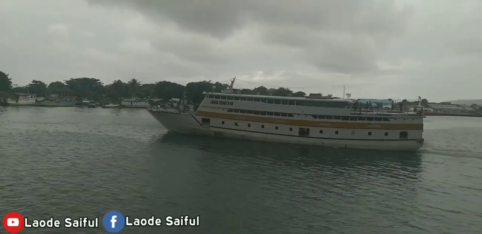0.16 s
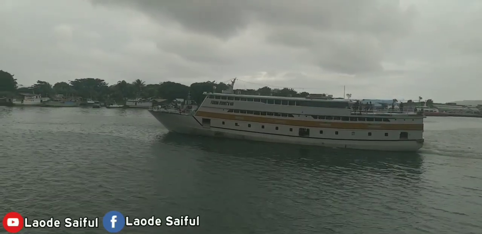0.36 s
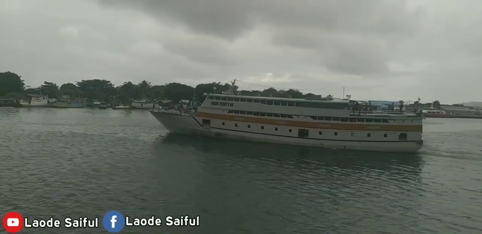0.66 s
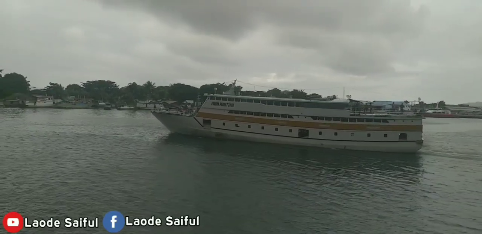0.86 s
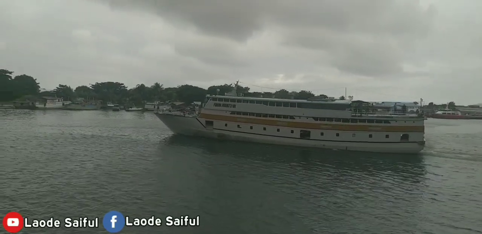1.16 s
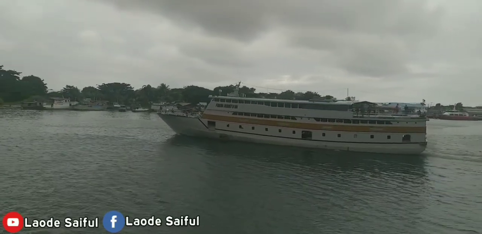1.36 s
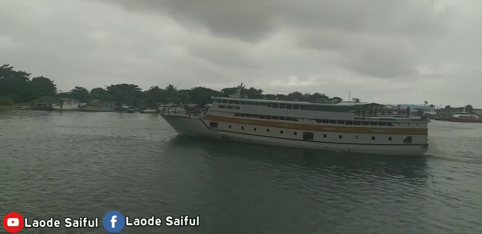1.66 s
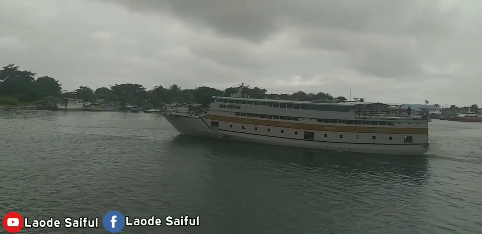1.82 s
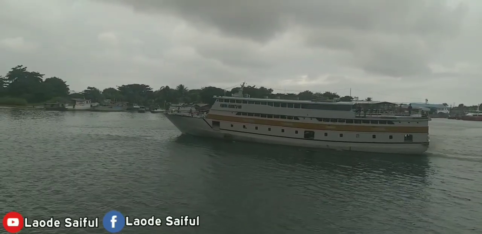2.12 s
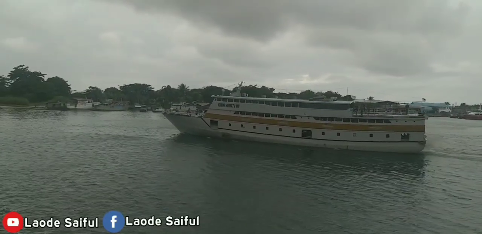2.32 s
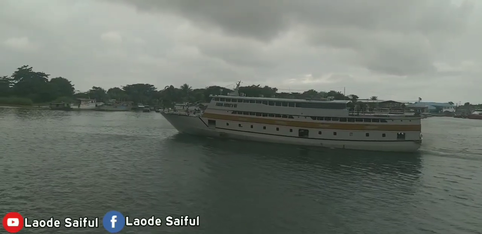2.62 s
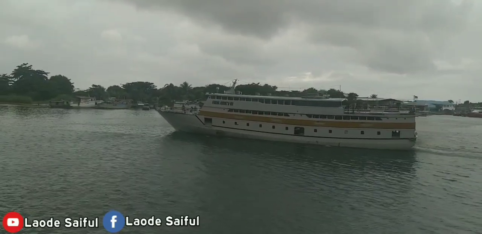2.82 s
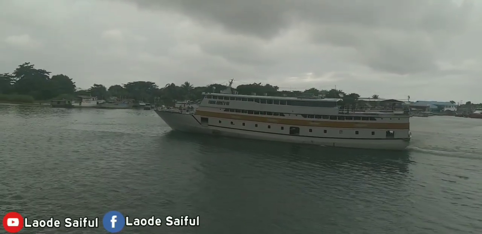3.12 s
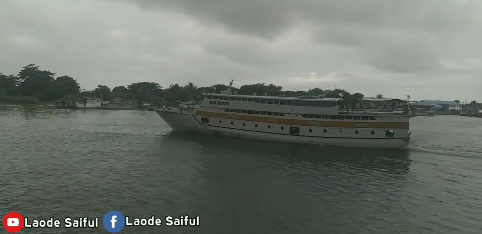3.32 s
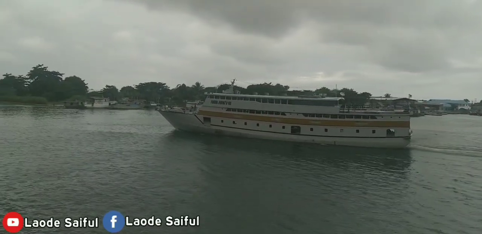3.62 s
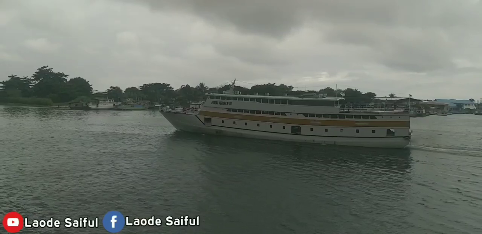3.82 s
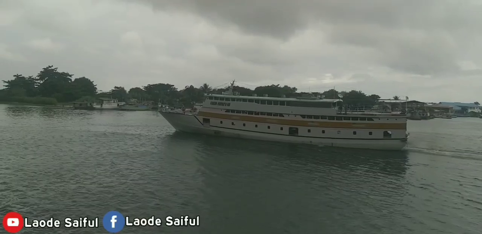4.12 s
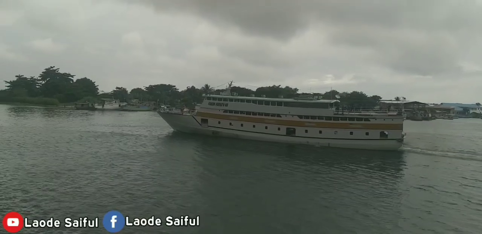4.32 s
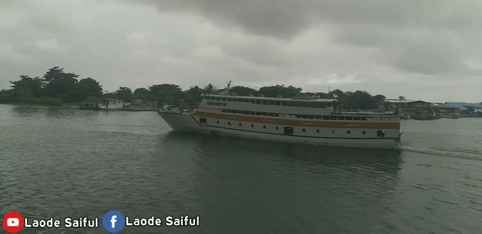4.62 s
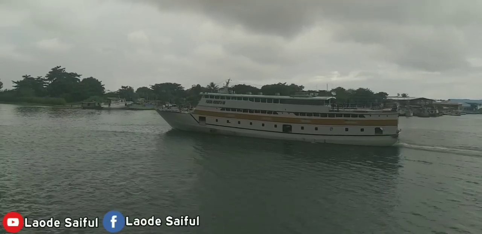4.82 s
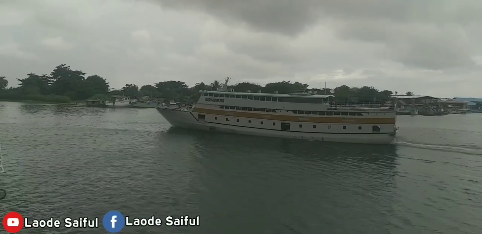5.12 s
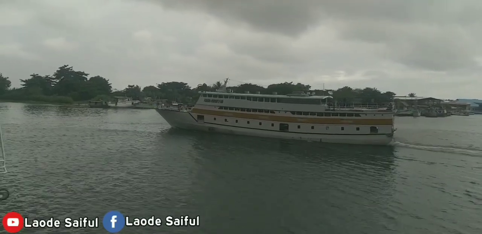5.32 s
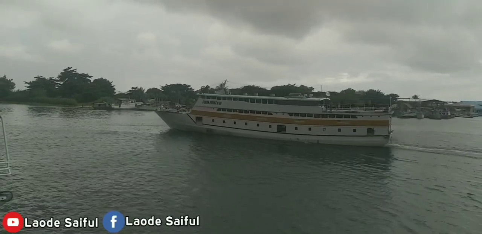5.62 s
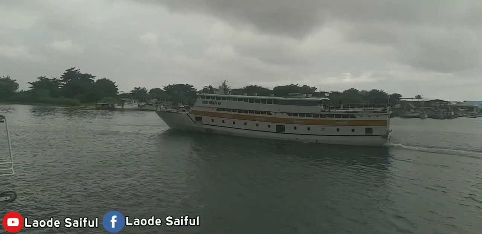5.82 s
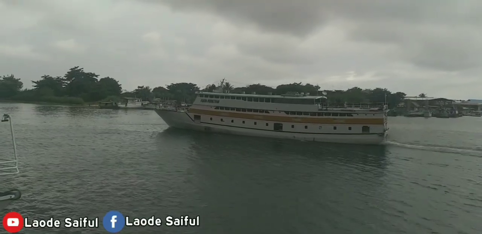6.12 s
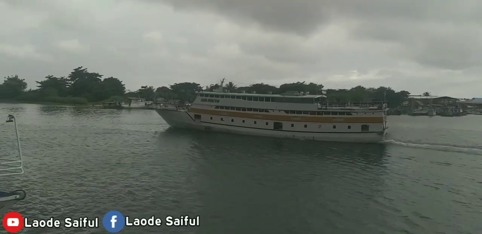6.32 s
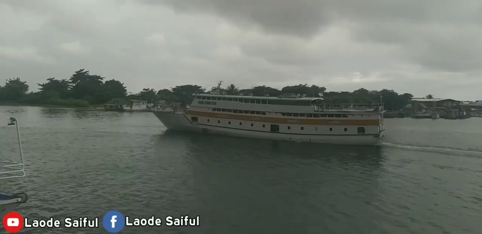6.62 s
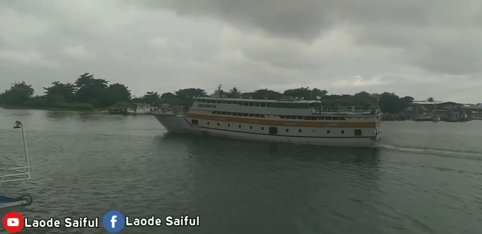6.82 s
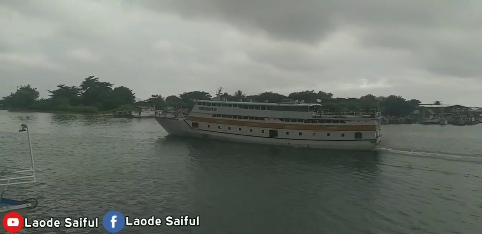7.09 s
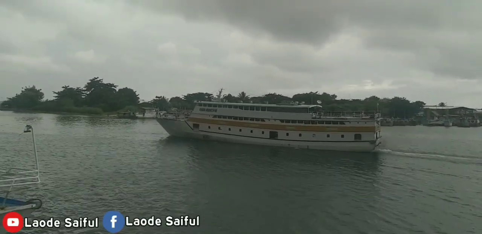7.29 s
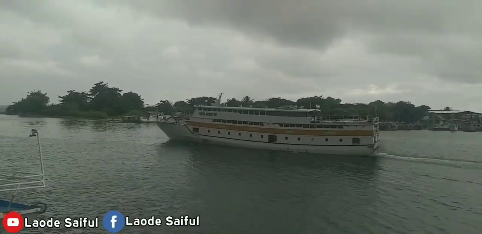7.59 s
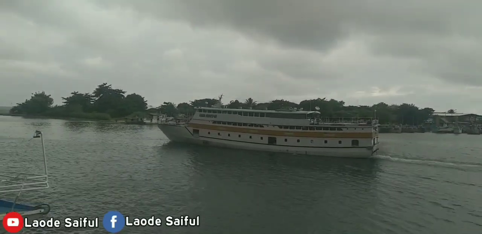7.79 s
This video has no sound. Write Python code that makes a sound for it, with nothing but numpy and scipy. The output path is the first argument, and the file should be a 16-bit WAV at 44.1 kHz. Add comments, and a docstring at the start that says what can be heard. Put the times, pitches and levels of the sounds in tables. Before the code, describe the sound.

A slow single-cylinder boat engine knocks and ticks in a fast even rattle over open water while gusts of wind buffet the microphone.

```python
"""Slow boat engine across open water

A single-cylinder engine knocks eleven times a second, each knock followed by a brighter tick: short pulses
ring through resonances, with a bounce off the water and tails of noise.
Gusts buffet the phone's microphone as uneven low noise, and single slaps of air sound as dying low cycles.
Under it all, shaped noise makes the far hiss of the wash, with splashes on the hull and finer spray."""
import sys
import numpy as np
from scipy import signal
from scipy.fft import rfft, irfft, next_fast_len
from scipy.io import wavfile
from scipy.ndimage import uniform_filter1d

SR = 44100
rng = np.random.default_rng(int(sys.argv[2]) if len(sys.argv) > 2 else 0)


def pcm_store(signal):
    """Save signal as 16-bit PCM."""
    levels = np.round(np.clip(np.atleast_2d(signal), -1, 1) * 32767)
    wavfile.write(sys.argv[1], SR, levels.astype(np.int16).T)


N = 350595  # length in samples


def undb(db):
    """Amplitude ratio of a level in dB."""
    return 10 ** (np.asarray(db) / 20)


def unit(x):
    """Scale to an RMS of 1."""
    return x / np.sqrt(np.mean(x ** 2))


def curves(table, s):
    """Columns of a table, joined by straight lines and read at the times s."""
    t, *columns = np.transpose(table)
    return [np.interp(s, t, column) for column in columns]


def noise():
    """White noise over the whole scene."""
    return rng.standard_normal(N)


def walk(rate):
    """Random levels held 1 / rate seconds and smoothed twice into slopes; RMS 1."""
    hold = int(SR / rate)
    steps = np.repeat(rng.standard_normal(N // hold + 1), hold)
    return unit(uniform_filter1d(uniform_filter1d(steps, hold), hold)[:N])


def colour(x, points):
    """Filter by the gains of (f/Hz, level/dB) points on a log-frequency axis."""
    hz, db = np.transpose(points)
    size = next_fast_len(N)
    f = np.maximum(np.arange(size // 2 + 1) * SR / size, 1)
    gain = undb(np.interp(np.log(f), np.log(hz), db))
    return irfft(rfft(x, size) * gain, size)[:N]


def band(x, hz, width_hz):
    """One resonance, gain 1 at the centre."""
    return signal.lfilter(*signal.iirpeak(hz, hz / width_hz, SR), x)


def steep(x, hz, width_hz):
    """A resonance applied twice, for steeper sides."""
    return band(band(x, hz, width_hz), hz, width_hz)


def below(x, hz):
    """Steep low-pass."""
    return signal.sosfilt(signal.butter(4, hz, fs=SR, output="sos"), x)


def fade(x, t60):
    """Every pulse leaves an exponential tail that drops 60 dB in t60 seconds."""
    return signal.lfilter([1], [1, -np.exp(-np.log(1000) / (t60 * SR))], x)


def even_out(x, share, seconds):
    """Take part of the chance swell out of narrow noise."""
    swell = np.sqrt(uniform_filter1d(x ** 2, int(seconds * SR)) + 1e-12)
    return unit(x / swell ** share)


def train(s, size):
    """Pulses of the given sizes at the times s."""
    out = np.zeros(N + SR)
    np.add.at(out, (s * SR).astype(int), size)
    return out[:N]


def swells(s, hold, db, rise_db_s, fall_db_s):
    """Summed power of events that rise, hold and fall, each slope straight in dB."""
    t = np.arange(0, N / SR + .002, .002)
    s, hold, db = (np.reshape(column, (-1, 1)) for column in (s, hold, db))
    before_db = np.maximum(rise_db_s * (s - t), 0)
    after_db = np.maximum(fall_db_s * (t - s - hold), 0)
    power = np.sum(undb(db - before_db - after_db) ** 2, axis=0)
    return np.interp(np.arange(N) / SR, t, power)


# waves breaking on the hull: at full strength t/s, hold t/s, splash level/dB, fine spray level/dB
HULL_WAVES = [(.0, .03, -42, -49), (.16, .04, -49, -56), (0.658, .05, -43, -42.5), (.9, .03, -46, -50),
              (1.3, .08, -44, -46), (1.78, 0.15, -41.5, -43), (2.076, 0.065, -44, -43), (2.7, .1, -51, -55),
              (4.26, 0.027, -45, -50), (4.437, 0.026, -40, -44), (4.7, 0.14, -43.5, -43),
              (5.26, .1, -44, -40), (5.43, 0.1, -39, -37.5), (5.6, 0.14, -44, -45),
              (6.0, 0.13, -41.5, -39.5), (6.22, .1, -52, -45), (6.85, .1, -58, -48), (7.105, .06, -44, -42),
              (7.6, .03, -44, -48), (7.83, .12, -44, -47)]
WAVE_RISE_DB_S, WAVE_FALL_DB_S = 112, 80
LAPPING_DB, MIST_DB = -49, -50.5  # splash and spray between waves


def waves():
    """Levels of splash and spray in dB: each wave's power adds to a steady floor."""
    s, hold, splash_db, spray_db = np.transpose(HULL_WAVES)
    levels = []
    for db, rest_db in ((splash_db, LAPPING_DB), (spray_db, MIST_DB)):
        power = undb(rest_db) ** 2 + swells(s, hold, db, WAVE_RISE_DB_S, WAVE_FALL_DB_S)
        levels.append(10 * np.log10(power))
    return levels


# spectrum of the far wash, relative: f/Hz, level/dB
WASH_SPECTRUM = [(240, -5.5), (400, 3.5), (519, -16), (834, -2), (1050, -8), (1560, -9), (1760, -7.5),
                 (2150, -12), (4160, -13), (7670, -23.5), (10400, -21), (14100, -36.5), (15500, -50)]


def water():
    """A steady far hiss, waves splashing on the hull, and the finer spray that they throw."""
    splash_db, spray_db = waves()
    hiss = unit(below(colour(noise(), WASH_SPECTRUM), 9600)) * undb(-37.5 + 0.75 * walk(24.91))
    splash = unit(steep(noise(), 4000, 4000)) * undb(splash_db + 1.2 * walk(30))
    fine = signal.sosfilt(signal.butter(6, 11300, "high", fs=SR, output="sos"), noise())
    fine = fine + undb(-1) * band(fine, 14600, 2500)
    spray = unit(fine) * undb(spray_db + 2.0 * walk(25))
    return hiss + splash + spray


# the wind between gusts, relative: t/s, level/dB, edge above the rumble level/dB
BREEZE_LEVELS = [(0, -24, -10), (.5, -26, -10.5), (1, -25.5, -12), (1.6, -33, -11), (2.1, -13.5, -11),
                 (2.5, -26.5, -3), (3, -23.5, -2), (3.5, -24.5, -7), (4, -23, -6), (4.5, -27.5, -4.5),
                 (5, -25, -5), (5.5, -28, -1), (6.4, -28.5, -5), (6.9, -22.5, -7), (7.3, -31, -12),
                 (7.7, -17.5, -0.5), (7.95, -17.5, -5)]
# gusts, relative: at full strength t/s, hold t/s, level/dB, edge above the rumble level/dB
GUST_EVENTS = [(0.037, .05, -19, -14), (0.215, 0.0041, -16, -7.5), (0.595, 0.053, -19.5, -16),
               (.81, 0.012, -16.5, -27), (.92, 0.017, -10.5, -16), (1.124, .06, -18, -26),
               (1.287, 0.19, -21, -8.5), (1.659, 0.018, -19.5, -15), (1.88, 0.19, -13, -14.5),
               (2.15, 0.085, -12.5, -15), (2.276, .03, -8, -5), (2.597, 0.017, -11.5, -24),
               (2.894, 0.067, -17.5, -16), (3.094, 0.02, -29, -18), (3.2, 0.09, -17.5, -18),
               (3.535, 0.045, -16, -20), (3.637, 0.052, -19, -3), (3.774, 0.0086, -14.5, -9),
               (3.853, 0.019, -8, -10.5), (4.065, 0.019, -13.5, -5), (4.116, 0.027, -16.5, -8),
               (4.219, 0.012, -19, -20), (4.372, 0.013, -13.5, -10), (4.435, 0.07, -18.5, -7),
               (4.7, .03, -26, -12), (5.125, .005, -24, -18), (5.215, .015, -29, -18),
               (5.283, .01, -23, -5), (5.573, 0.016, -20, -5), (6.558, 0.075, -18, -17),
               (6.773, .025, -15.5, -17), (6.924, 0.026, -11, -12), (7.02, 0.026, -16, -9),
               (7.173, 0.014, -15, -20), (7.28, .01, -19, -25), (7.39, 0.024, -8, -15),
               (7.48, .045, -17.5, -19), (7.608, 0.067, -9.5, -5.5), (7.723, .015, -13, -12),
               (7.804, 0.012, -13.5, -2), (7.935, .03, -12, -4)]
GUST_RISE_DB_S, GUST_FALL_DB_S = 360, 213


def gusts():
    """Level of the wind, and of its upper edge above the rumble, both in dB, from summed powers."""
    breeze_db, breeze_edge_db = curves(BREEZE_LEVELS, np.arange(N) / SR)
    s, hold, db, edge_db = np.transpose(GUST_EVENTS)
    power = undb(breeze_db) ** 2 + swells(s, hold, db, GUST_RISE_DB_S, GUST_FALL_DB_S)
    edge = undb(breeze_db + breeze_edge_db) ** 2
    edge = edge + swells(s, hold, db + edge_db, GUST_RISE_DB_S, GUST_FALL_DB_S)
    return 10 * np.log10(power), 10 * np.log10(edge / power)


# spectrum of the wind rumble at the microphone, relative: f/Hz, level/dB
RUMBLE_SPECTRUM = [(15, -70), (25, -40), (59, -19), (123, 1), (172, -3.5), (210, 0), (233, -6), (260, -5.5),
                   (600, -31.5), (780, -69), (1320, -120)]


def wind():
    """Eddies on the microphone: a lumpy rumble that climbs in pitch as the gust grows, with a ragged upper edge."""
    gust_db, edge_db = gusts()
    strong = np.clip((gust_db + 28.0) / 14, 0, 1)  # 0 in a breeze, 1 in a full gust
    eddies = undb((2.32 + 2.2 * strong) * walk(60))
    rumble = even_out(colour(noise(), RUMBLE_SPECTRUM), .5, .03)
    flap = even_out(below(steep(noise(), 260, 330), 600), .5, .02)
    body = undb(-0.5) * (1 - 0.61 * strong) * rumble + 0.48 * strong * flap
    # the air tears at the crests of each swing, and higher up only in strong gusts
    crest = .5 + 0.92 * np.abs(body)
    edge = even_out(below(band(noise(), 408, 520), 780), 0.23, 0.032)
    tear = undb(-20.5) * strong ** 2 * unit(below(band(noise(), 1160, 900), 2030))
    upper = undb(edge_db - 5.0) * crest * ((.5 + 0.31 * strong) * edge + tear)
    # the largest eddies are too slow to follow each flap
    deep_db = 0.56 * uniform_filter1d(gust_db, int(.3 * SR)) - 19.5
    deep = undb(deep_db) * even_out(steep(noise(), 62, 108), 0.34, 0.059)
    return undb(gust_db - 2.0) * eddies * (body + upper) + deep


# single slaps of air on the microphone, relative: t/s, level/dB, pitch f/Hz, rasp level/dB
AIR_SLAPS = [(0.04, -3.5, 183, -15.5), (0.122, -12, 142, -17), (0.595, -12, 228, -23),
             (0.921, -7, 213, -21), (0.939, 0, 242, -23), (0.991, -5, 133, -23), (1.434, -8, 157, -25),
             (1.648, -12, 191, -21), (1.861, -1.5, 143, -20), (1.896, -2.5, 277, -27),
             (1.997, -7, 275, -14), (2.057, -10, 163, -16), (2.145, -4.5, 282, -16), (2.221, 0.5, 197, -20),
             (2.274, -4.5, 214, -0.5), (2.29, -4, 185, -13), (2.59, -5, 274, -19), (2.608, 0, 215, -23),
             (2.9, -6, 263, -9.5), (3.101, -6, 154, -17), (3.22, -3, 394, -25), (3.548, -2, 183, -23),
             (3.845, -.3, 268, -29), (3.864, -3.5, 207, -14), (4.058, -5, 212, -16), (4.111, -9, 137, -13),
             (4.364, -4.5, 243, -17), (5.194, -7.5, 208, -19), (6.54, -7, 203, -29), (6.907, -11, 127, -22),
             (7.18, -4.5, 206, -21), (7.386, -7, 296, -23), (7.399, -1, 170, -20.5),
             (7.511, -3.5, 183, -22), (7.604, -4, 230, -12), (7.64, -6, 243, -9.5), (7.716, -3.5, 285, -24),
             (7.738, -6.5, 288, -6), (7.808, 0, 165, -19), (7.857, -12, 483, 2), (7.921, 0.5, 118, -13)]
SLAP_T60_S = 0.053


def slaps():
    """Each slap swells, then dies as a few rough cycles: a sine with band noise for rasp."""
    out = np.zeros(N + SR)
    t = np.arange(SR // 5) / SR
    chance = rng.standard_normal((len(AIR_SLAPS), len(t)))
    shape = (1 - np.exp(-t / 0.0038)) * np.exp(-np.log(1000) * t / SLAP_T60_S)
    for (s, db, hz, rasp_db), air in zip(AIR_SLAPS, chance):
        rasp = undb(rasp_db + 1.0) * unit(below(band(air, 620, 800), 1160))
        swing = np.sin(2 * np.pi * hz * t) + rasp
        start = int(s * SR)
        out[start:start + len(t)] += undb(db) * shape * swing
    return out[:N]


# loudness of the two strokes as the air carries them, relative:
# t/s, knock level/dB, its treble share level/dB, tick level/dB, its treble share level/dB
STROKE_LEVELS = [(0.05, -24.5, -14, -26, 3), (0.46, -19, -8.5, -28.5, -1.5), (0.82, -22.5, -8.5, -29.5, -2),
                 (1.2, -22, -11, -27, -1), (1.55, -23, -11, -30, -5), (1.9, -23, -5, -33.5, 5),
                 (2.2, -22.5, -5.5, -34, 7), (2.6, -24.5, -6, -34.5, 6.5), (3.1, -22.5, -9.5, -37.5, 5.5),
                 (3.7, -23, -4.5, -36, 7.5), (3.95, -17, -5, -28.5, -3), (4.3, -23, -1.5, -26, -0.5),
                 (4.64, -24, -6, -24.5, -9), (5.0, -19.5, -6, -29.5, 0.5), (5.35, -24, -3.5, -38, 6.5),
                 (5.9, -23, -4, -32, -4.5), (6.45, -24, -6, -32.5, -6), (7.0, -23.5, -3, -38.5, 6),
                 (7.4, -23, -8, -39, 4.5), (7.95, -23, 0, -32, 2.5)]
# strokes that ring out brighter or duller than their neighbours: t/s, treble lift level/dB
BRIGHT_STROKES = [(.144, 1), (.328, 2.5), (.548, 3.5), (1.053, 1.5), (1.144, 3.5), (1.508, 4.5), (2.145, 5),
                  (2.236, 1.5), (2.418, -6.5), (2.691, 3.5), (2.966, -3), (3.148, 3.5), (3.604, 3),
                  (3.968, -2), (4.008, 5.5), (4.15, 7), (4.917, 2.5), (5.06, -2), (5.19, -6), (5.281, -5),
                  (5.827, 5.5), (7.252, 3), (7.375, 5), (7.434, -2), (7.707, 4.5)]
SAME_STROKE_S = .012  # a lift reaches strokes nearer than this
CYCLE_S = .091


def beats(columns, start_s, late_ms, scatter_db, treble_scatter_db):
    """Time, size and treble size of every stroke, with a chance scatter in level."""
    chance = rng.standard_normal((len(late_ms), 2)).T
    s = start_s + CYCLE_S * np.arange(len(late_ms)) + late_ms / 1000
    db, treble_db = curves(STROKE_LEVELS, s)[columns]
    lift_db = sum(lift * (abs(s - at) < SAME_STROKE_S) for at, lift in BRIGHT_STROKES)
    size = undb(db + scatter_db * chance[0])
    treble = size * undb(treble_db + lift_db + treble_scatter_db * chance[1])
    return s, size, treble


TICK_START_S = .0538


def tick(late_ms):
    """A short bright ring, repeated weakly, over a soft dull tap: resonances struck by pulses, with noise tails."""
    s, size, treble = beats(slice(2, None), TICK_START_S, late_ms, scatter_db=1.5, treble_scatter_db=1.94)
    hit = train(s, treble) + train(s + .0017, undb(-6) * treble)
    ring = undb(32.0) * steep(hit, 4750, 1330)
    tap = undb(33) * steep(train(s, size), 850, 700) + undb(11) * steep(train(s, size), 2400, 1500)
    fizz = undb(1.5) * fade(train(s, treble), 0.041) * unit(steep(noise(), 3970, 3820))
    rustle = undb(1) * fade(train(s, size), 0.026) * unit(steep(noise(), 950, 1300))
    air = undb(-14.5) * fade(train(s, np.sqrt(size * treble)), 0.07) * unit(steep(noise(), 12300, 6000))
    return ring + tap + fizz + rustle + air


KNOCK_START_S = .0018


def knock(late_ms):
    """A blunt exhaust pop, its bounce off the water just after, the pipe's thump and a spray of later echoes."""
    s, size, treble = beats(slice(2), KNOCK_START_S, late_ms, scatter_db=1.1, treble_scatter_db=1.7)
    # the swell moves the mirror, so the bounce drifts in lag and strength
    drift = (s * SR).astype(int) % N
    bounce_s = s + .00072 + .00004 * walk(2)[drift]
    bounce = undb(3 + 1.5 * walk(4)[drift])
    pair = train(s, size) + train(bounce_s, size * bounce)
    # the open pipe sends back a weaker, inverted copy
    pipe_s = .00196 + .00006 * walk(3)[drift]
    pair -= undb(-9) * (train(s + pipe_s, size) + train(bounce_s + pipe_s, size * bounce))
    pop_band = signal.butter(2, [520, 3500], "band", fs=SR, output="sos")
    pop = undb(24.5) * below(signal.sosfilt(pop_band, pair), 7100)
    snap = undb(14) * steep(train(s, treble) + train(bounce_s, treble * bounce), 3900, 5700)
    thump = undb(38) * band(train(s, size), 240, 190)
    # noise tails: echoes from the hull, then brighter fizz and air
    hull = steep(noise(), 1100, 900) + 0.96 * steep(noise(), 2560, 670)
    echoes = undb(-8) * fade(train(bounce_s, size), .055) * unit(hull)
    fizz = undb(-2.0) * fade(train(bounce_s, treble), 0.04) * unit(steep(noise(), 4500, 4600))
    air = undb(-6.5) * fade(train(s, np.sqrt(size * treble)), 0.048) * unit(steep(noise(), 16800, 4600))
    return pop + snap + thump + echoes + fizz + air


# drift against an even beat: t/s, knock lateness t/ms, tick lateness t/ms
BEAT_DRIFT = [(0.09, 0.0, 0.0), (0.82, 0.2, -0.2), (1.73, -1.5, -1.7), (2.28, -1.2, -1.9), (3.19, 1.3, .4),
              (4.0, 2.0, 2.1), (4.55, 1.2, 2.3), (5.19, 1.9, 2.9), (6.35, 3.6, 6.5), (7.38, 2.3, 7.6),
              (7.92, 2.5, 8.1)]


def engine():
    """Both strokes of every cycle, drifting slowly against an even beat."""
    knock_ms, tick_ms = curves(BEAT_DRIFT, np.arange(0, N / SR, CYCLE_S))
    return knock(knock_ms) + tick(tick_ms)


# stereo width, level of side against mid before the wavering gain: f/Hz, level/dB
STEREO_WIDTH = [(60, -32), (110, -50), (200, -51.5), (380, -45), (700, -42), (1290, -17), (2380, -12),
                (4400, -37.5), (8120, -14), (15000, -16.5)]


def scene():
    """Water, wind, slaps and engine mixed nearly mono, with a faint flickering width."""
    mid = engine() + wind() + slaps() + water()
    # nearly mono, with a faint flickering stereo width
    side = colour(mid * (0.092 + walk(40)), STEREO_WIDTH)
    return np.array([mid + side, mid - side])


# response of the phone's microphone: f/Hz, level/dB
MIC_RESPONSE = [(30, -23.5), (70, 1.39), (6000, -0.2), (8500, -1), (10400, -5), (12500, -4.5), (15500, -16)]
TOP_HZ = 15720


def record(dry):
    """The phone's microphone is dull near 10 kHz, rounds the loudest peaks and cuts the top."""
    heard = np.array([colour(channel, MIC_RESPONSE) for channel in dry])
    rounded = np.tanh(0.81 * heard) / 0.81
    top = signal.ellip(12, .2, 90, TOP_HZ, fs=SR, output="sos")
    return signal.sosfilt(top, rounded)


dry = scene()
out = record(dry)
pcm_store(out)
```